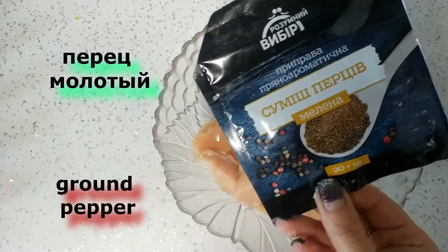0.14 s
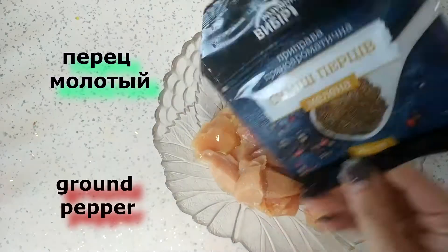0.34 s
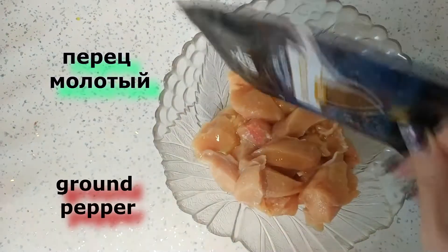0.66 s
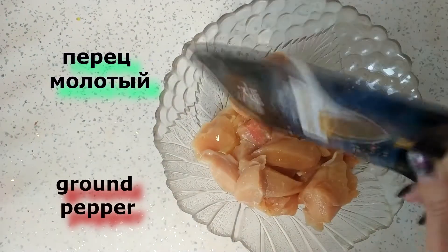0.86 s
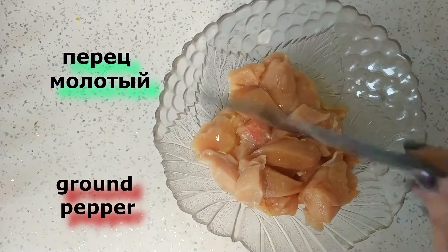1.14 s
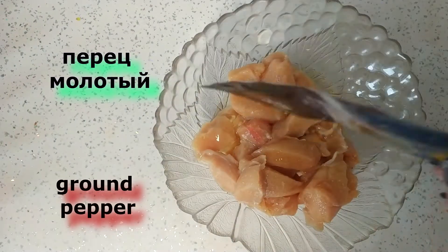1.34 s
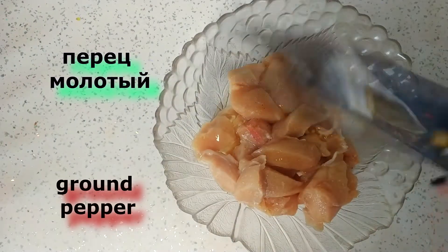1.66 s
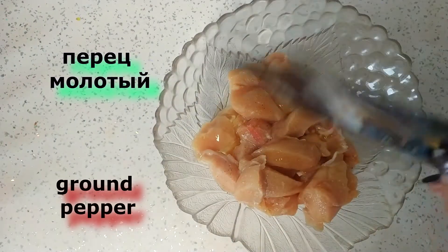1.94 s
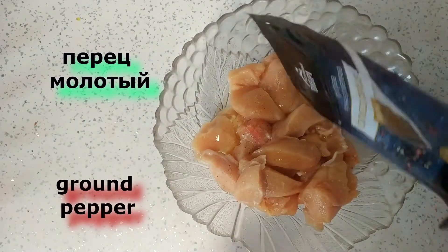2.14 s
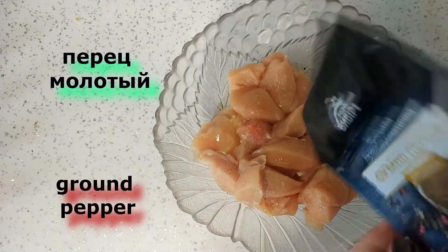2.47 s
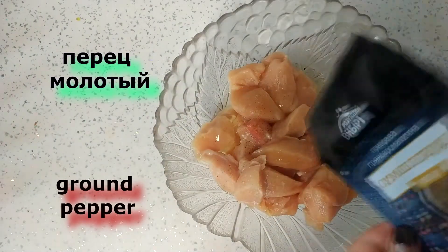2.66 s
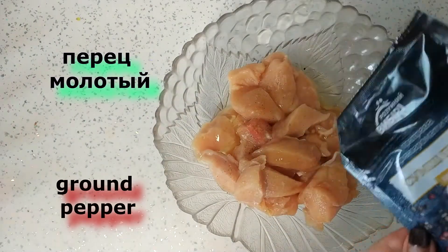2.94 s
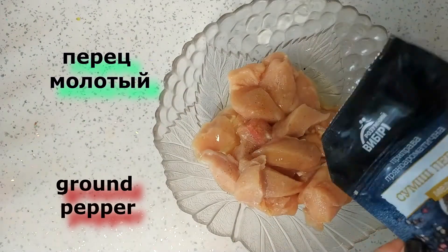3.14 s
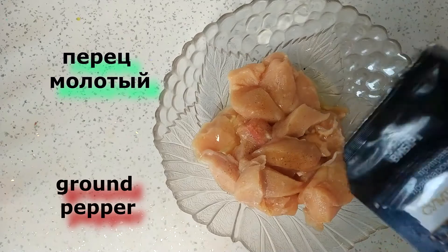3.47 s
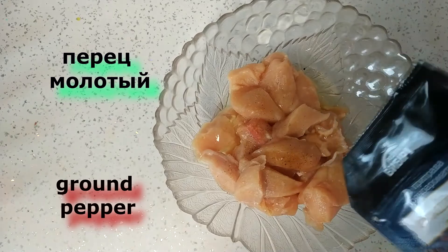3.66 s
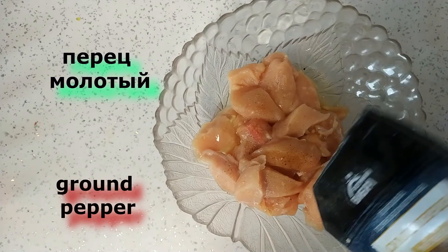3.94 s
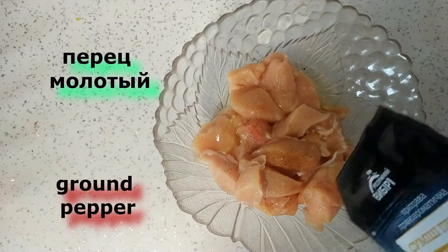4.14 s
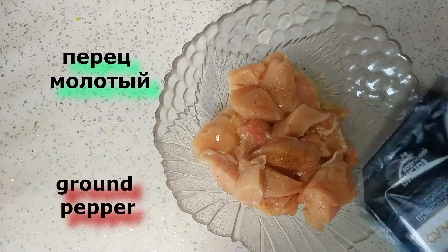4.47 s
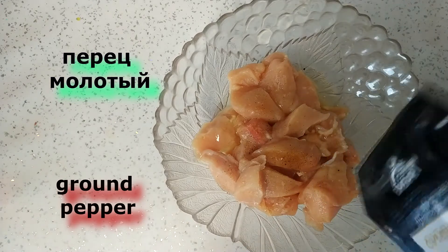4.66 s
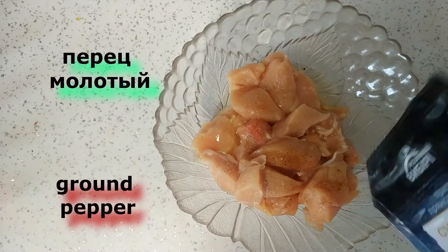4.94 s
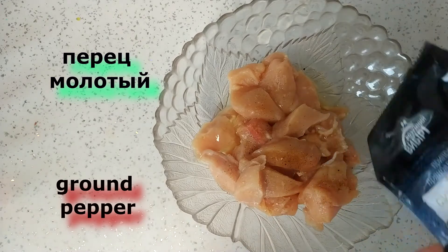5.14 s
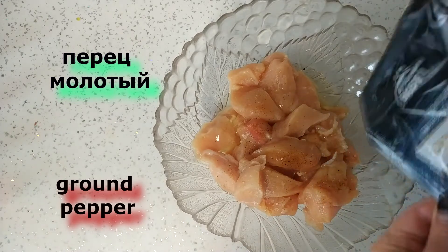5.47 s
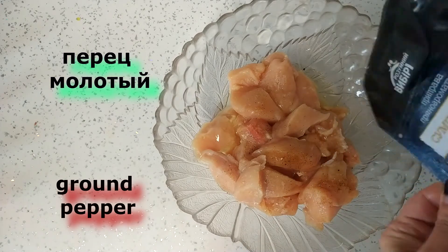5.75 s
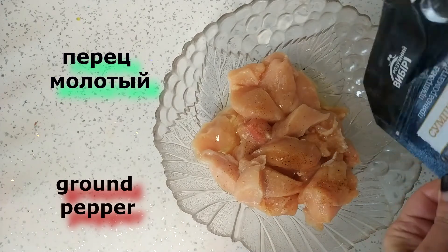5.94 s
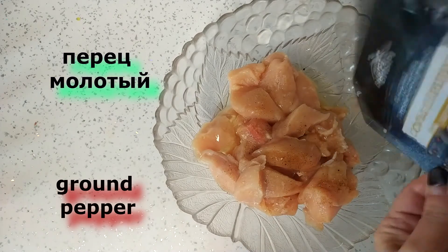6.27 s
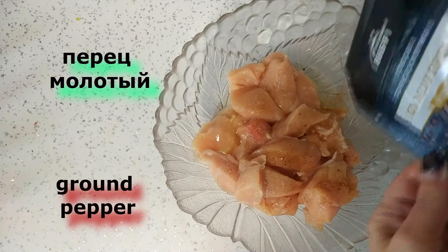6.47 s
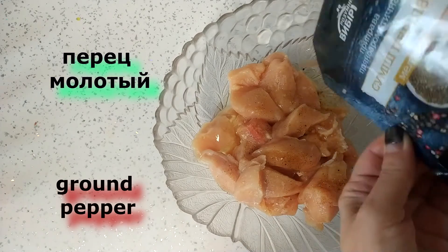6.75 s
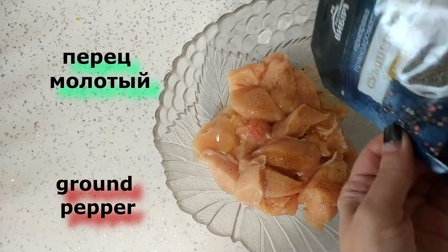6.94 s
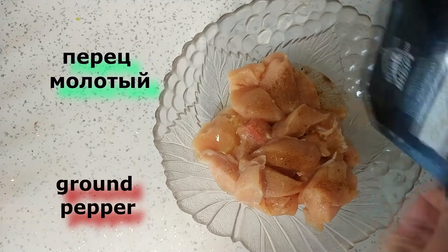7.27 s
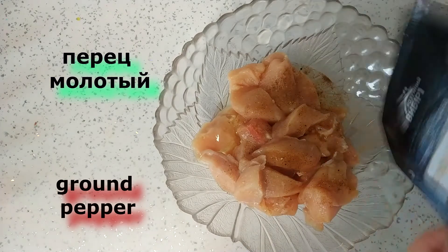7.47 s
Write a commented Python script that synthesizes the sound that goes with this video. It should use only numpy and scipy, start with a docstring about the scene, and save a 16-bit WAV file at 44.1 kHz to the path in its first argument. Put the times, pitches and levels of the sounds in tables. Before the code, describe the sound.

A foil spice pouch crackles and snaps sharply as it is shaken and squeezed over raw chicken, with dull little knocks and faint hum.

```python
"""A foil sachet of ground pepper is shaken and squeezed over a bowl of chicken in a kitchen.
Its creases buckle in sharp snaps: noise cracks and rings in the bands of four parts of the film.
Panels flip with dull knocks, wrinkles crackle in tiny noise bursts, and sliding powder hisses.
The hard room answers with short noise tails, over a faint hum and hiss."""
import sys
import numpy as np
from scipy import signal
from scipy.fft import rfft, irfft, next_fast_len
from scipy.io import wavfile
from scipy.ndimage import map_coordinates

SR = 44100
rng = np.random.default_rng(int(sys.argv[2]) if len(sys.argv) > 2 else 0)


def unload_audio(sound):
    """Save the sound as a 16-bit wav file, at the path given as the first command line argument."""
    columns = np.transpose(np.atleast_2d(sound))
    # keep every value between -1 and 1, then stretch to whole-number steps
    steps = np.round(np.clip(columns, -1, 1) * 32767)
    wavfile.write(sys.argv[1], SR, steps.astype(np.int16))


N = 335160
TOP_HZ = 16150  # upper limit of the sound

# how alike left and right are for near sounds: (frequency [Hz], likeness [0 to 1])
NEAR_ALIKE = [(60, 0.97), (130, 0.83), (290, 1), (640, 0.69), (1400, 0.91), (3000, 0.17), (15000, 0.012)]
# how alike left and right are for sound from all around: (frequency [Hz], likeness [0 to 1])
ROOM_ALIKE = [(130, 0.4), (290, 0.77), (640, 0.36), (1400, 0.013)]


def amp(db):
    """Turn decibels into a gain."""
    return 10 ** (np.asarray(db) / 20)


def unit(x):
    """Scale to an rms of 1."""
    return x / np.sqrt(np.mean(x ** 2) + 1e-20)


def along(points, hz):
    """Read (frequency, value) points on a log frequency axis."""
    point_hz, values = np.transpose(points)
    return np.interp(np.log(hz + 1), np.log(point_hz + 1), values)


def gains(rows, rise_db_per_s, fall_db_per_s):
    """Gestures swell, hold and die away: one gain curve for each level column."""
    t = np.arange(N) / SR
    start, hold, *levels = np.transpose(rows)[:, :, None]
    before_db = rise_db_per_s * np.maximum(start - t, 0)
    after_db = fall_db_per_s * np.maximum(t - start - hold, 0)
    # where gestures overlap, the strongest wins
    return [amp(np.max(db - before_db - after_db, axis=0)) for db in levels]


def filtered(x, response):
    """Multiply the spectrum of x by a function of frequency."""
    n = x.shape[-1]
    padded = next_fast_len(n + n // 8, True)
    spectrum = rfft(x, padded) * response(np.fft.rfftfreq(padded, 1 / SR))
    return irfft(spectrum, padded)[..., :n]


def coloured(x, colour):
    """Shape the spectrum of x with (frequency, level) points."""
    return filtered(x, lambda hz: amp(along(colour, hz)))


def band(x, lo_hz, hi_hz):
    """A band-pass that adds nothing ahead of the sound, so that attacks stay sharp."""
    sos = signal.butter(2, [lo_hz, min(hi_hz, TOP_HZ)], "band", fs=SR, output="sos")
    return signal.sosfilt(sos, x)


def wobble(rate):
    """A smooth random curve through `rate` random points a second."""
    knots = rng.standard_normal(int(N * rate / SR) + 4)
    return map_coordinates(knots, [np.arange(N) * rate / SR])


def jerks(size, depth_db, rate):
    """A crease runs across the film in jerks: a lumpy gain with `rate` random points a second."""
    knots = rng.uniform(-1, 1, 200)
    return amp(depth_db * map_coordinates(knots, [np.arange(size) * rate / SR], order=1, mode="mirror"))


def stereo(pair, alike):
    """Blend two unrelated signals into a left and right of a given likeness."""
    def mid_side_gains(hz):
        angle = np.arccos(np.clip(along(alike, hz), -1, 1)) / 2
        return np.array([np.cos(angle), np.sin(angle)])

    mid, side = filtered(pair, mid_side_gains)
    return np.array([mid + side, mid - side])


def grains(rate, spread_db, t60):
    """Tiny noise bursts at random moments, about `rate` a second; spread_db makes their sizes uneven."""
    hits = rng.random(N) < rate / SR
    sizes = hits * amp(spread_db * np.minimum(rng.exponential(size=N), 3))
    power_kept = np.exp(-2 * np.log(1000) / (t60 * SR))  # from one sample to the next
    power = signal.lfilter([1], [1, -power_kept], sizes ** 2)
    return unit(np.sqrt(power) * rng.standard_normal((2, N)))


def fade(t60, rise_s):
    """A quick rise and an exponential decay, cut off after a twelfth of a second, of rms 1."""
    t = np.arange(SR // 12) / SR
    return unit(-np.expm1(-t / rise_s) * np.exp(-np.log(1000) * t / t60))


def own_tones(size, spacing_hz, depth_db):
    """Stereo noise with mild random peaks: every fold of the film has its own colour."""
    knots_db = depth_db * rng.uniform(-1, 1, 400)

    def ripple(hz):
        return amp(map_coordinates(knots_db, [hz / spacing_hz], mode="mirror"))

    return filtered(stereo(rng.standard_normal((2, size)), NEAR_ALIKE), ripple)


def film_part(excitation, lo_hz, hi_hz):
    """One part of the film answers in its own band, with rms 1 over the first hundredth of a second."""
    burst = band(excitation, lo_hz, hi_hz)
    return burst / np.sqrt(np.mean(burst[:, :SR // 100] ** 2))


def background(hiss_db):
    """An appliance hums with a slightly fuzzy note over faint, even hiss."""
    # hum notes: (frequency [Hz], speed of the wobble [points per s], level before the wobble [dB])
    hum_notes = [(197.3, 3.5, -67)]
    # colour of the hiss: (frequency [Hz], level [dB])
    hiss_colour = [(25, -22), (110, -12), (170, 10), (310, 6.5), (400, 4.5), (700, 0.5), (3000, -3.5),
                   (13000, -2), (16000, -6)]
    t = np.arange(N) / SR
    hum = 0
    for hz, rate, db in hum_notes:
        level = amp(db + wobble(rate))
        hum = hum + level * unit(np.sin(2 * np.pi * hz * t + 0.76 * wobble(rate)))
    noise = stereo(rng.standard_normal((2, N)), ROOM_ALIKE)
    return hum + amp(hiss_db) * unit(coloured(noise, hiss_colour))


def kitchen(x, gap_s, count=76):
    """Tiles and worktop answer with a fading noise tail, a new one as the pouch moves about."""
    # time for the echo to fade by 60 dB: (frequency [Hz], time [s])
    echo_t60 = [(200, 1), (600, 0.5), (1500, 0.35), (4000, 0.35), (9000, 0.31), (15000, 0.35)]
    # colour of the echo against the direct sound: (frequency [Hz], level [dB])
    echo_colour = [(150, -11), (500, -8), (1500, -8), (4000, -6.5), (9000, -8.5), (15000, -7.5)]
    out = np.zeros((2, N + SR))
    for piece in np.array_split(np.arange(N), count):
        hz, t, noise = signal.stft(rng.standard_normal((2, SR // 2)), SR, nperseg=256)
        t60 = along(echo_t60, hz)[:, None]
        # the square root gives short and long tails the same energy
        decay = np.exp(-np.log(1000) * t / t60) * np.sqrt(2 * np.log(1000) / (t60 * SR))
        colour = amp(along(echo_colour, hz))[:, None]
        tail = signal.istft(noise * decay * colour, SR, nperseg=256)[1]
        wet = signal.fftconvolve(x[None, piece], stereo(tail, ROOM_ALIKE), axes=1)
        out[:, piece[0] + round(gap_s * SR):][:, :wet.shape[1]] += wet
    return out[:, :N]


def resonate(x, level_db):
    """Resonances around the pouch lift their own bands; the narrow ones ring on a little."""
    # resonances: (frequency [Hz], width [Hz], lift [dB])
    peaks = [(340, 66, 8), (535, 75, 6), (901, 43, 7), (1013, 160, 4), (1515, 210, 2.5), (3850, 230, 2.5),
             (4260, 2300, 0.5), (14360, 2850, 11)]

    def lift(hz):
        total = 1
        for centre, width, db in peaks:
            peak = 1j * hz * width / (centre * centre - hz * hz + 1j * hz * width)
            total = total + (amp(db) - 1) * peak
        return total

    return amp(level_db) * filtered(x, lift)


def powder(level_db):
    """Countless pepper grains skid over the film in clumps: a fine, bright, uneven hiss."""
    # powder sliding at each tip or shake: (start [s], hold [s], level before level_db [dB])
    slides = [(0.28, 0.052, -55.5), (0.435, 0.01, -52), (0.468, 0.024, -45.5), (0.535, 0.011, -51),
              (0.565, 0.042, -49), (0.66, 0.0088, -52.5), (0.745, 0.03, -54), (0.878, 0.013, -43),
              (1.015, 0.013, -37), (1.14, 0.019, -39.5), (1.27, 0.034, -57), (1.376, 0.0046, -45.5),
              (1.435, 0.0052, -43), (1.62, 0.049, -41), (1.677, 0.018, -42), (1.805, 0.0026, -44.5),
              (2.48, 0.035, -47.5), (2.56, 0.027, -50.5)]
    # colour of the hiss: (frequency [Hz], level [dB])
    skid_colour = [(500, -31), (1500, -4), (2500, -5), (4000, 1.5), (7000, 4), (10000, 2.5), (13000, 1.5),
                   (16000, -4.5)]
    flow, = gains(slides, rise_db_per_s=501, fall_db_per_s=265)
    skids = grains(rate=2300, spread_db=2.8, t60=0.004)
    clumps = amp(1.3 * wobble(55))
    return amp(level_db) * flow * unit(clumps * coloured(skids, skid_colour))


def handling(flap, crinkle, flap_db, crinkle_db):
    """Between snaps the panels flutter dully, and wrinkles tick, each size in its own register."""
    # colour of the flutter: (frequency [Hz], level [dB])
    flutter_colour = [(30, 0), (100, -45), (170, 13), (300, 5), (430, 0.5), (680, 3.5), (1000, -26),
                      (1500, -10), (3000, -1), (6000, -65)]
    # wrinkles of three sizes:
    # (low edge [Hz], high edge [Hz], rate [ticks per s], 60 dB fade [s], level in the mix [dB])
    wrinkles = [(740, 2600, 90, 0.018, -5.5), (1820, 5500, 120, 0.014, -11.5), (4940, 9500, 210, 0.018, -5)]
    flutter = stereo(grains(rate=170, spread_db=8.0, t60=0.012), NEAR_ALIKE)
    flutter = unit(coloured(flutter, flutter_colour))
    ticks = 0
    for lo, hi, rate, t60, db in wrinkles:
        size_ticks = stereo(grains(rate, spread_db=0.0, t60=t60), NEAR_ALIKE)
        ticks = ticks + amp(db) * unit(band(size_ticks, lo, hi))
    return amp(flap_db) * flap * flutter + amp(crinkle_db) * crinkle * ticks


def flaps(level_db, thud_t60, panel_t60):
    """A panel flips with a dry knock: the pouch thuds, the panel pops and its edge ticks faintly."""
    # panels flipping over, levels before level_db:
    # (time [s], thud of the whole pouch [dB], pop of the panel [dB], pitch of the pop [Hz])
    flips = [(0.562, -54, -58, 636), (0.982, -55, -47, 905), (1.002, -45, -33.5, 670),
             (1.028, -48, -48, 900), (1.1135, -38.5, -37.5, 970), (1.122, -39.5, -40.5, 890),
             (1.214, -45, -46, 1500), (1.405, -47, -49, 1090), (1.425, -41.5, -38, 900),
             (1.492, -49, -46, 1150), (1.659, -43, -48, 900), (1.676, -40.5, -55, 1330),
             (1.733, -50, -66, 915), (1.807, -49, -53, 900), (2.481, -44.5, -48, 910),
             (2.536, -49, -57, 900), (2.587, -37, -45, 900), (2.64, -50, -54, 900), (2.7217, -52, -48, 950),
             (2.7442, -40, -40, 840), (2.808, -35.5, -34, 1000), (2.864, -49, -47, 1050),
             (2.8997, -44.5, -44.5, 1020), (2.953, -49, -41, 930), (3.025, -32.5, -37, 850),
             (3.1077, -40, -40, 970), (3.002, -48, -61, 900), (3.164, -48, -49, 1060),
             (3.204, -46, -35, 1500), (3.2449, -38.5, -37, 860), (3.537, -38, -44, 950),
             (3.595, -34.5, -40, 950), (3.743, -48, -81, 800), (3.776, -54, -71, 800),
             (3.832, -47.5, -72, 700), (3.893, -45.5, -45, 890), (4.0507, -59, -38.5, 1390),
             (4.078, -47, -48, 980), (4.338, -51, -41, 1110), (4.404, -36, -31, 1000),
             (4.4984, -36, -41, 1110), (4.529, -38, -42, 770), (4.6432, -43, -51, 640),
             (4.648, -30.5, -35, 720), (4.696, -38, -42, 800), (4.658, -32.5, -32, 850),
             (4.719, -32, -31, 890), (4.772, -43, -28, 820), (4.8096, -38, -44, 620),
             (4.8229, -33.5, -34, 775), (4.888, -40, -57, 890), (4.9469, -42, -36, 960),
             (5.093, -47, -37, 950), (5.125, -39.5, -55, 1010), (5.141, -37, -45, 900),
             (5.387, -39, -33.5, 870), (5.4845, -40, -44, 960), (5.5032, -32.5, -37.5, 960),
             (5.5217, -33.5, -39, 610), (5.567, -42.5, -43, 710), (5.6, -50, -61, 900),
             (5.648, -39, -39.5, 1040), (5.6793, -56, -37, 940), (5.691, -35.5, -41, 794),
             (5.777, -47, -50.5, 1000), (5.8217, -46, -36, 940), (5.951, -35, -47, 795),
             (6.054, -60, -45, 1040), (6.281, -46, -42, 1100), (6.325, -33.5, -35, 910),
             (5.9968, -41, -36, 1140), (6.1461, -38, -34, 1210), (6.181, -31, -32.5, 1020),
             (6.2704, -40, -53, 950), (6.4301, -38, -40, 820), (6.4444, -37, -35, 1120),
             (6.496, -48, -55, 890), (6.5832, -41, -43, 830), (6.655, -31.5, -31, 820),
             (6.7434, -45, -35, 1130), (6.962, -35.5, -48, 900), (6.9839, -38, -61, 790),
             (7.0096, -44, -29.5, 1060), (7.0175, -57, -39, 930), (7.0285, -42, -56, 890),
             (7.115, -44, -49, 960), (7.1352, -46, -36.5, 1040), (7.2348, -44, -38, 1380),
             (7.361, -42, -29.5, 1040), (7.3998, -47, -38.5, 840), (7.4189, -40, -44, 950)]
    thud_hz, tick_hz = (191, 427), (890, 3880)  # bands of the pouch and of the folds at the edge
    pop_spread = 2 ** 0.39  # the pop reaches 0.39 octave either side of its pitch
    tick_db = -4.5  # the edge against the panel
    shapes = fade(thud_t60, rise_s=0.00065), fade(panel_t60, rise_s=0.00048), fade(0.028, rise_s=0.00025)
    out = np.zeros((2, N + SR))
    for s, thud_db, panel_db, hz in flips:
        bands = thud_hz, (hz / pop_spread, hz * pop_spread), tick_hz
        levels_db = thud_db, panel_db, panel_db + tick_db
        for (lo, hi), shape, db in zip(bands, shapes, levels_db):
            noise = own_tones(len(shape), spacing_hz=139.0, depth_db=4)
            burst = film_part(shape * noise, lo, hi)
            out[:, round(s * SR):][:, :len(shape)] += amp(db + level_db) * burst
    return out[:, :N]


def settling(creases):
    """Each snap jolts the film and the powder in it, which come to rest in a scatter of tiny clicks."""
    level_db, rise_s, t60 = -23, 0.014, 0.16  # the level is against the snap
    t = np.arange(SR // 4) / SR
    swell = -np.expm1(-t / rise_s) * np.exp(-np.log(1000) * t / t60)
    power = np.zeros(N + SR)
    for s, db, *_ in creases:
        power[round(s * SR):][:len(t)] += (amp(db + level_db) * swell) ** 2
    clicks = stereo(grains(rate=430, spread_db=2, t60=0.004), NEAR_ALIKE)
    return np.sqrt(power[:N]) * unit(band(clicks, 1500, 11000))


def small_creases(crinkle, count=60):
    """Small creases give way at scattered random moments, as strongly as the pouch is squeezed then."""
    # level against the crinkle, then body, sparkle and sharpness as for the loud snaps, all in dB
    typical_db, scatter_db = (-21.5, 3, -30, 4), 0.5
    moments = ((np.arange(count) + rng.random(count)) / count * (N - 1)).astype(int)
    rows = np.array(typical_db) + scatter_db * rng.standard_normal((count, 4))
    creases = []
    for i, (db, *colour) in zip(moments, rows):
        creases.append((i / SR, db + 20 * np.log10(crinkle[i]), *colour))
    return creases


def fold_ring(x, hz):
    """The buckling fold stresses its own pitch, without making the snap louder."""
    lift_db, narrowness_q = 3.5, 2.2
    peak = signal.lfilter(*signal.iirpeak(hz, narrowness_q, fs=SR), x)
    y = x + (amp(lift_db) - 1) * peak
    return y * np.linalg.norm(x) / np.linalg.norm(y)


def snaps(creases, crack_t60, sharp_db, boom_db):
    """Each crease lets go with a crack, then each part of the film rings briefly in its own band."""
    # the whole pouch, a panel, the crease and its edge, bands before the random shift:
    # (low edge [Hz], high edge [Hz], rise [s], 60 dB fade of the ring [s], trim [dB])
    film_parts = [(170, 477, 0.00089, 0.11, -7), (694, 2350, 0.0021, 0.053, 1.85),
                  (1970, 6100, 0.0013, 0.052, 0.5), (5120, 9950, 0.00054, 0.059, -1)]
    # as the grip changes, folds of other sizes buckle: (time [s], pitch of the fold [Hz])
    fold_tone = [(1.5, 7160), (1.62, 5760), (2.11, 3840), (2.31, 5900), (2.59, 3850), (3.42, 4320),
                 (3.56, 6240), (4.28, 4930), (4.41, 5740), (4.8, 3800), (5.17, 2830), (5.3, 7000),
                 (5.41, 3680), (5.88, 3370), (6.35, 3600), (6.41, 6400), (6.64, 3600), (7.31, 3400)]
    # the whole pouch joins in only when much of the film moves, a panel nearly always
    thud_per_body, flex_per_body = 1.36, 0.95  # dB for each dB of body
    fold_scatter_oct = 0.081  # folds differ in size, so each snap sits a little higher or lower
    crack = fade(crack_t60, rise_s=0.00051)
    rings = [fade(t60, rise) for _, _, rise, t60, _ in film_parts]
    out = np.zeros((2, N + SR))
    for s, db, body_db, sparkle_db, sharpness_db in creases:
        run = jerks(len(crack), depth_db=3.5, rate=500)
        shift = 2 ** (fold_scatter_oct * rng.standard_normal())
        parts_db = thud_per_body * body_db, flex_per_body * body_db, 0, sparkle_db
        snap = 0
        for (lo, hi, _, _, trim_db), ring, part_db in zip(film_parts, rings, parts_db):
            shape = np.hypot(amp(sharpness_db + sharp_db) * crack, ring * run)
            noise = own_tones(len(shape), spacing_hz=820, depth_db=2.5)
            burst = film_part(shape * noise, lo * shift, hi * shift)
            snap = snap + amp(part_db + trim_db) * burst
        fold_hz = np.interp(s, *np.transpose(fold_tone))
        out[:, round(s * SR):][:, :len(crack)] += amp(db) * fold_ring(snap, fold_hz)
    out = out[:, :N]
    # the jumping film also pushes a little air
    air = signal.sosfilt(signal.butter(2, 70, fs=SR, output="sos"), out)
    return out + amp(boom_db) * air


def scene():
    """As the pouch moves to the right, the sound of its film reaches the left side a little late."""
    # the loud creases buckling, with body before its scaling and sharpness before sharp_db:
    # (time [s], level [dB], body against level [dB], sparkle against level [dB], crack over ring [dB])
    loud_creases = [(0.775, -45.5, -17, -8, -9), (0.7902, -44.5, -16, 3.5, -7), (0.9997, -40, -1, -6, 23),
                    (1.0292, -44, -14, -9, -5), (1.0428, -48, 1, -1, 26), (1.0727, -35.5, -19, -13, -11),
                    (1.1036, -35, 1, -15, -5), (1.153, -52.5, -14, 15, 2), (1.4341, -43, 4.5, 0, -12),
                    (1.4548, -47.5, 10, -12, 20), (1.5183, -34, 4, 7, 6), (1.539, -33.5, -6.5, -14, -8),
                    (1.582, -31, -0.5, -2, -3), (1.6031, -20.5, -32, -3.5, 22), (1.621, -37, -23, -6, 3),
                    (1.677, -33.5, -19, -4, 8), (1.692, -44, -14, 9, 15), (1.8724, -43.5, -3.5, -0.5, 14),
                    (1.945, -35, -1.5, 7, -13), (2.1114, -22, -11.5, 0.5, 17),
                    (2.3077, -24, -10.5, -6, -13), (2.3106, -30, -6.5, 3.5, 21),
                    (2.3493, -31.5, -10, -4, 1), (2.575, -40.5, -8, -2, -8), (2.5863, -24, -7.5, -10, 14),
                    (2.627, -58, -3, -14, 5), (2.6855, -42.5, 4.5, -17, 11.5), (2.7806, -43, 3, -2.5, 18),
                    (2.822, -40, 1.5, -11, 14), (2.866, -51, 4, -8, 8), (2.881, -56, -12, 4, 17),
                    (2.921, -66, -13, 19, 16), (3.0393, -43, 2, 9, 21), (3.1001, -44, 7, -0.5, 6),
                    (3.3348, -40, 5, -7, 11.5), (3.4211, -34, -2.5, 14, 22), (3.4849, -27.5, -7, 2, 15),
                    (3.5624, -31, -4, 9.5, 22), (3.58, -38, -2, -1, 20), (3.5925, -31, -5, -9, 13),
                    (3.6752, -34, -2.5, 0, 22.5), (3.9324, -46, 3.5, -8, 9), (3.9879, -35.5, -0.5, -2, 13),
                    (4.0359, -51.5, 1.5, 9, 9), (4.2692, -44, 5.5, -1, 15), (4.2795, -28, -8.5, 7.5, 10),
                    (4.2931, -35, -9, 6, 9), (4.3159, -36, -24, -3, -10), (4.3386, -46, -5, 2, 8),
                    (4.3894, -35, 0.5, -5, 3), (4.3963, -31, -6, 6.5, -12), (4.4027, -29, 1, 1, 20),
                    (4.453, -37, 0, -13, -9), (4.4863, -30.5, -3.5, -14, 20), (4.5414, -34, -4, -24, 13),
                    (4.5645, -45, 6, -8, 16), (4.611, -49, 7.5, -18, 22), (4.6902, -36.5, -3, 3, -2),
                    (4.7545, -37, 4, -5, -24), (4.7892, -32.5, 3.5, -27, 28), (4.8301, -29.5, -3.5, -2, 15),
                    (4.8441, -43, -7, -7, 8), (4.9052, -32.5, -5.5, -7.5, 17.5), (4.9941, -38, -1, -6, 18),
                    (5.083, -56.5, 7, 8, 8), (5.139, -45, 2.5, 2.5, 7), (5.1687, -29.5, -2, 1.5, 11),
                    (5.3041, -25, -15, 0, 12.5), (5.3224, -32.5, -4.5, 10.5, 26),
                    (5.3991, -35.5, -1.5, 1.5, 7), (5.4103, -25, -5.5, 1.5, -17),
                    (5.586, -43.5, -10, -10, 15), (5.6286, -52, 7.5, -28, 12), (5.7632, -50, -5, 8, 17),
                    (5.8366, -37, -8, -5, 25), (5.8626, -30.5, 1.5, 2, -4), (5.88, -26, -26, -12, 20),
                    (5.8858, -23.5, -5.5, 3.5, -15), (5.9129, -37, -24, 8, 12), (5.9479, -32, -7, 2.5, 12),
                    (5.9679, -34.5, -0.5, 4.5, 5), (6.01, -37.5, -4, -2, 12), (6.0278, -26, -7, -11, 12),
                    (6.0504, -24, -10, -14, 15), (6.0956, -28.5, -3, 3.5, -8), (6.1599, -38, -7, -8, 2),
                    (6.1928, -35.5, -1.5, -22, 14), (6.247, -32.5, 0, -4, -7), (6.2878, -45, 2, -15, 19),
                    (6.3221, -31.5, -14, -14, 15), (6.3291, -32, -4.5, -26, 3), (6.3471, -25, -14, -29, 3),
                    (6.3535, -28.5, -14, 6.5, 4), (6.4045, -24.5, -4, 3, 19.5), (6.6402, -28, -6.5, -4, 0),
                    (6.6584, -23.5, -12, -4.5, 15), (6.712, -35, 1, -3, 13), (6.764, -45, 4, -1, 9),
                    (6.7901, -36, 0, 0.5, 11), (6.8033, -31.5, -5, 1, -13), (6.817, -27, -2, -7, 18.5),
                    (6.8608, -30, -2.5, 1.5, 7.5), (6.8839, -49, 8, -14, 24), (6.94, -40, 2, -17, 18),
                    (6.963, -44, -13, -5, 12), (6.9985, -30.5, -1, -39, 23), (7.115, -53, -4, 3, 13),
                    (7.134, -47.5, -10, 2, 0), (7.1653, -30.5, -21, -5.5, 13.5),
                    (7.1886, -36.5, 2.5, -14, -12), (7.268, -41, 2, -12, -10), (7.28, -49, 12.5, 8, 17),
                    (7.3085, -27, -5.5, -13, 6), (7.319, -26.5, -20, 2, 16), (7.367, -30.5, 0.5, 3.5, 8),
                    (7.3766, -34.5, -3, -12, -12), (7.4511, -35, -25, -10, 13),
                    (7.5214, -45.5, 6.5, -24, 26), (7.5341, -38.5, -8, -34, -22.5),
                    (7.581, -50, 12.5, -41, -10)]
    # fingers squeezing or shaking, levels before handling turns them down:
    # (start [s], hold [s], flutter [dB], crinkle [dB])
    squeezes = [(1.02, 0.036, -52, -40.5), (1.47, 0.23, -51.5, -44.5), (2.33, 0.03, -55, -48),
                (2.62, 0.64, -51, -47), (3.46, 0.035, -40.5, -41), (3.9, 0.031, -51, -47),
                (4.33, 0.035, -41, -31.5), (4.68, 0.018, -40, -38.5), (5.35, 0.18, -44.5, -45),
                (5.86, 0.25, -43, -37), (6.25, 0.23, -48.5, -54), (6.68, 0.14, -44.5, -69),
                (7.18, 0.5, -50.5, -59)]
    # the pouch moves from over the bowl to the right: (time [s], delay on the left [s])
    left_delay = [(1.2, 0.00006), (2.0, 0.00021), (5.7, 0.00018), (6.3, 0.00017), (7.3, 0.0002)]
    flap, crinkle = gains(squeezes, rise_db_per_s=239, fall_db_per_s=92)

    creases = list(loud_creases) + small_creases(crinkle)
    film = snaps(creases, crack_t60=0.0031, sharp_db=-13.5, boom_db=6.5)
    film = film + settling(loud_creases)
    film = film + flaps(level_db=-4.5, thud_t60=0.044, panel_t60=0.037)
    film = film + handling(flap, crinkle, flap_db=-3.0, crinkle_db=-4.0)
    pouch = resonate(film, level_db=-1.5)
    pepper = powder(level_db=3.5)

    t = np.arange(N) / SR
    late = t - np.interp(t, *np.transpose(left_delay))
    left = map_coordinates(pouch[0], [late * SR], order=5)
    near = np.array([left, pouch[1]]) + pepper
    echo = kitchen((pouch + pepper)[1], gap_s=0.003)  # the room is fed from the right channel
    return near + echo + background(hiss_db=-58.5)


def record(dry):
    """The camera keeps nothing above its band limit."""
    return filtered(dry, lambda hz: hz < TOP_HZ)


dry = scene()
out = record(dry)
unload_audio(out)
```